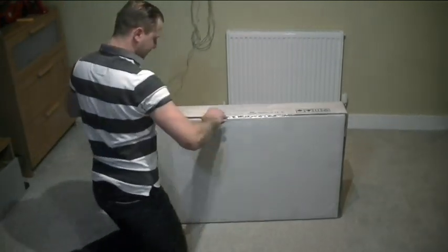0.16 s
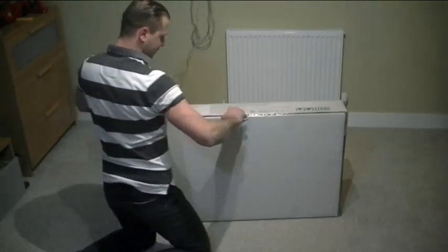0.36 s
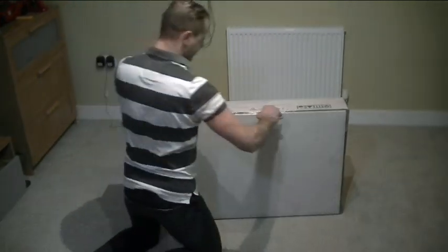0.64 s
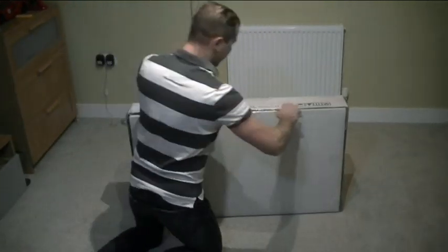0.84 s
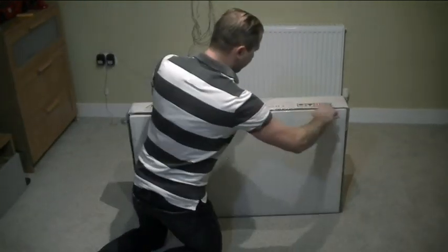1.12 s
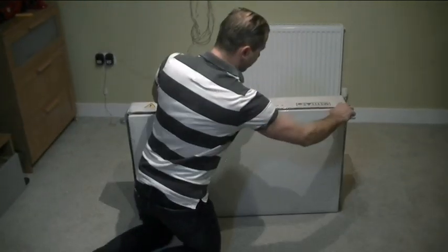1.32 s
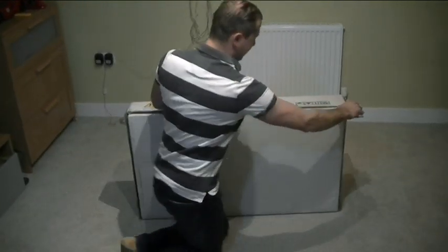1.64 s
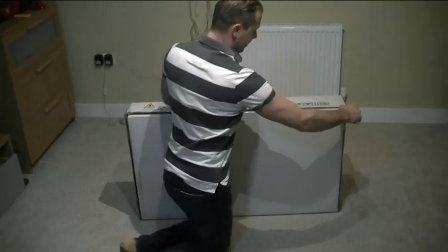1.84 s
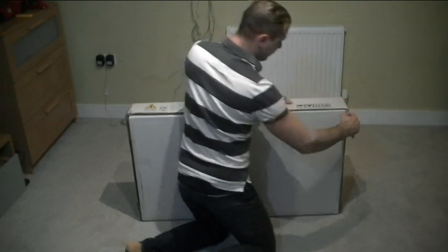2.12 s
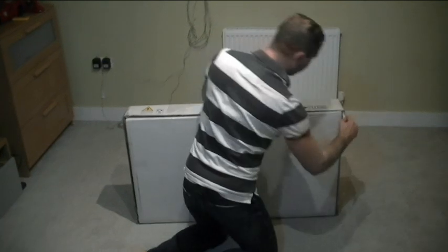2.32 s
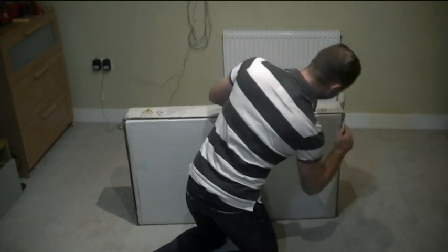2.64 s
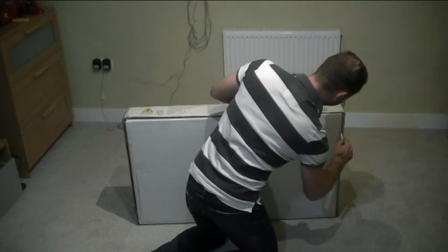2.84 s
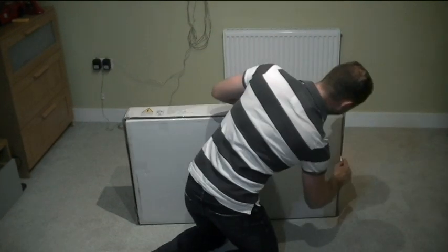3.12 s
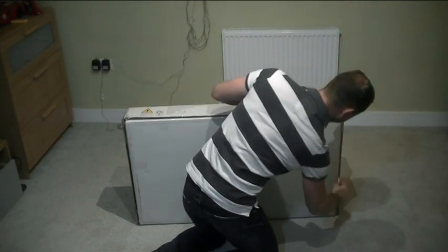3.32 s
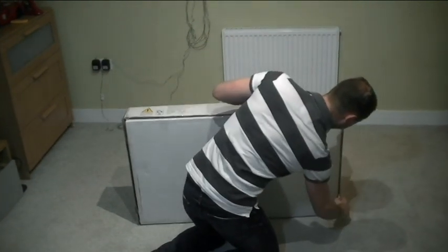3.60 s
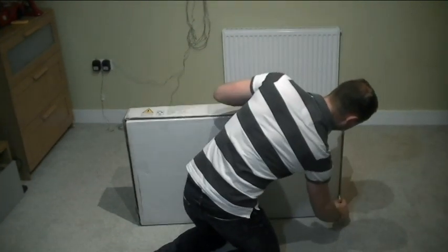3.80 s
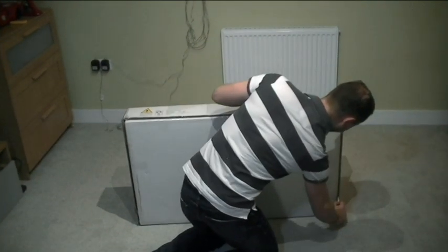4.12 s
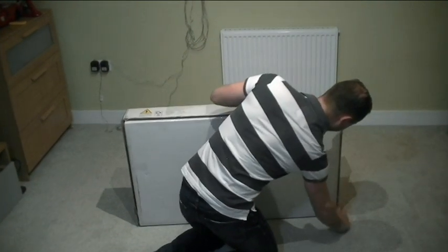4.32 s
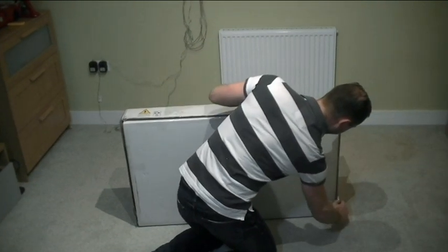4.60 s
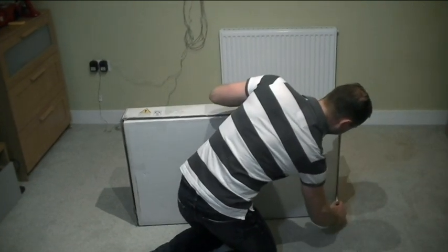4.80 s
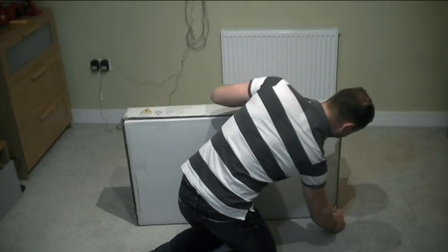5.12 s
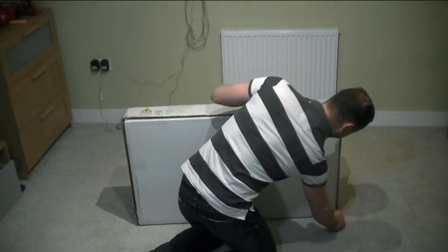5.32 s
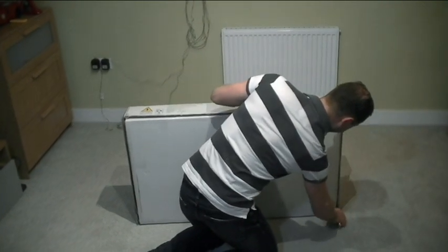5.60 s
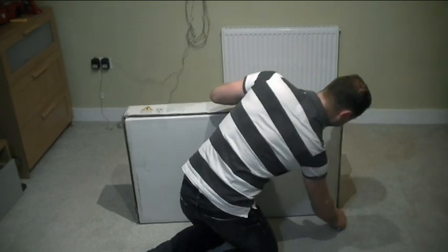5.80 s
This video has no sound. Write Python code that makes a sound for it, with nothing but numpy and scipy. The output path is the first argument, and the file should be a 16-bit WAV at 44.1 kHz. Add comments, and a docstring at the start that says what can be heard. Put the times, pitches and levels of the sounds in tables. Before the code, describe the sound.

Packing tape is cut from a big hollow box, heard from a few metres with a stereo pair. First comes a continuous gritty hiss with dry ticks and soft low bumps, thinning out; next come brief separate strokes with pauses, loud tape snaps and ripping bursts that make the cardboard knock and flutter. The carpeted room adds a short, close reverberation over faint steady noise.

```python
"""Knife through box tape

A few metres from the microphone pair, in a carpeted room, a knife slits the tape along a large cardboard box.
The sliding blade makes a stream of tiny fractures that drive tape, card and hollow box together.
The tape ticks and rips in short bursts; where a seam gives way, fractures make the box thump
and its wall and flap ring with a fluttering pitch. Echoes and a faint steady room noise surround it all."""
import sys
import numpy as np
from scipy import signal
from scipy.fft import rfft, irfft, next_fast_len
from scipy.io import wavfile
from scipy.ndimage import uniform_filter1d, map_coordinates

SR = 44100
rng = np.random.default_rng(int(sys.argv[2]) if len(sys.argv) > 2 else 0)


def generate_wav(signal):
    """Clip the signal to [-1, 1] and save it as 16-bit WAV at the path in sys.argv[1]."""
    frames = np.transpose(np.atleast_2d(signal))
    scaled = np.clip(frames, -1, 1) * 32767
    pcm = np.round(scaled).astype(np.int16)
    wavfile.write(sys.argv[1], SR, pcm)


N = 262395

# Two long cuts along the top of the box, as points on a curve.
# Each row: time in seconds, level in dB, bite into the cardboard in dB.
LONG_CUTS = [(0.0, -43.5, -4), (0.23, -46, -4), (0.33, -38, -4.5), (0.55, -42, -2), (0.72, -43, -6.5),
             (0.87, -37.5, -10), (1.0, -45.5, 0), (1.15, -41, -8.5), (1.27, -46, -6), (1.41, -43.5, -2),
             (1.55, -52, 4.5), (1.72, -59.5, 2.5), (1.78, -48.5, -2), (2.0, -47, -5), (2.16, -46, -5.5),
             (2.32, -54, -2), (2.39, -51.5, 1.5), (2.5, -65, -7)]
# Short pushes of the blade down the end of the box.
# Each row: start in seconds, length in seconds, level in dB, bite in dB.
PUSHES = [(2.543, 0.11, -57, -6.5), (2.651, .04, -51, 0.5), (2.7, 0.13, -39.5, -5.5),
          (2.896, .06, -49.5, 1.5), (2.955, 0.065, -41, -0.5), (3.131, 0.059, -38.5, -4.5),
          (3.227, 0.099, -47, -3), (3.344, 0.12, -49.5, -1), (3.495, 0.052, -45.5, -2),
          (3.658, 0.022, -41, -14), (3.906, 0.053, -54.5, -1.5), (4.023, 0.11, -57.5, 2.5),
          (4.2, 0.19, -44.5, -4), (4.738, 0.044, -60, 8), (4.868, 0.095, -45.5, -0.5),
          (5.006, 0.068, -63, 1.5), (5.101, 0.06, -50, 1.5), (5.24, 0.056, -48, -1.5),
          (5.3, 0.068, -41.5, -6), (5.407, 0.14, -49.5, -3.5), (5.56, 0.057, -52.5, -9),
          (5.729, 0.11, -58.5, -2), (5.802, 0.037, -53.5, -4)]
PUSH_ATTACK_S, PUSH_SAG_DB_PER_S, PUSH_RELEASE_S = 0.017, 17.5, 0.028
# The deeper the bite, the more the hollow box rumbles: rumble at a bite of 0 dB, and dB gained per dB of bite.
CUT_RUMBLE_DB, RIP_RUMBLE_DB, RUMBLE_PER_BITE = -8.5, -14.5, 0.85

# Short rips of the tape.
# Each row: start in seconds, level in dB, bite in dB, length in seconds, pitch of the tape in Hz.
RIPS = [(0.071, -38, -32, 0.023, 7350), (0.471, -38.5, -5.5, 0.022, 8200), (0.617, -35, -5.5, 0.0089, 6000),
        (0.656, -37.5, -1, 0.011, 5500), (0.73, -32.5, 3, 0.011, 3020), (0.799, -34.5, -4, 0.015, 8050),
        (0.92, -34.5, -6, 0.032, 6300), (1.007, -35, -18, 0.011, 5560), (1.504, -37, -10, 0.014, 6400),
        (1.745, -52.5, 1.5, 0.028, 3000), (1.864, -42.5, -9, 0.016, 6900),
        (2.131, -42.5, -0.5, 0.009, 5500), (2.688, -22.5, -8, 0.011, 11600),
        (2.733, -31.5, -6.5, 0.019, 11000), (2.776, -32.5, -3, .029, 7300), (2.952, -43, -6, 0.012, 10000),
        (2.992, -42, -5, 0.013, 8500), (3.054, -35, -4, 0.054, 11200), (3.257, -44.5, 0, 0.013, 3500),
        (3.636, -47.5, -1.5, 0.008, 9000), (3.669, -43.5, -7.5, 0.024, 4970), (3.988, -35, 0, 0.0086, 4380),
        (4.33, -28, -1, .039, 3120), (4.433, -40, -7, 0.0069, 3950), (4.64, -58, 1, 0.017, 2460),
        (4.766, -50.5, -12, 0.016, 3520), (4.883, -38.5, -8.5, .011, 4430),
        (5.155, -27.5, -3.5, 0.029, 4800), (5.302, -38, -17, 0.0044, 8600), (5.518, -44, -6, .008, 7700),
        (5.565, -42, -4.5, 0.015, 4500), (5.803, -42.5, 4, 0.0061, 2690)]
# Sharp ticks of the tape.
# Each row: time in seconds, relative level in dB, pitch of the snapping strip in Hz.
TICKS = [(0.2004, -45, 7200), (0.626, -39, 6040), (0.7396, -34, 6560), (0.8708, -37, 10000),
         (1.39, -41.5, 6600), (1.7254, -47.5, 8200), (2.272, -37.5, 5800), (2.3265, -43.5, 6360),
         (2.4771, -45.5, 8850), (2.771, -25, 5300), (3.137, -33, 10000), (3.258, -39.5, 8250),
         (3.4976, -42.5, 8500), (3.6315, -45.5, 10100), (3.874, -50.5, 6900), (3.911, -50.5, 9500),
         (4.0845, -46, 6900), (4.1721, -51.5, 6000), (4.207, -45, 6900), (4.238, -40.5, 7600),
         (4.6666, -52, 9600), (4.8771, -36.5, 7850), (5.124, -47, 9100), (5.3124, -32, 9250),
         (5.4218, -44, 7440), (5.5183, -43.5, 7700)]
# Thumps of the flexing box; wall and flap ring at pitches set by how much tape still holds them.
# Each row: start in seconds, boom in dB, clap relative to boom in dB, length in seconds,
# wall pitch in Hz, wall level in dB, flap pitch in Hz, flap level in dB.
THUMPS = [(0.733, -29, -3, 0.0067, 391, -22, 1560, -20), (1.187, -48, -18, 0.034, 224, -46, 1520, -64),
          (2.775, -58, 2, 0.0079, 191, -36, 2027, -30), (4.34, -38, 1, 0.015, 344, -26, 896, -21.5),
          (4.742, -63, -3, 0.019, 249.6, -44, 846, -45), (5.159, -34.5, -1, 0.031, 349, -19.5, 1980, -22.5),
          (5.81, -44, -10, 0.0077, 294, -37, 1620, -38)]
# The box wall gives softly under the hand. Each row: start in seconds, level in dB.
BUMPS = [(0.0, -44.5), (0.29, -50.5), (0.488, -50), (0.806, -43), (0.885, -47), (0.97, -47), (1.755, -46),
         (2.698, -39.5), (3.185, -57), (3.262, -47.5), (3.546, -51.5), (4.09, -55), (4.425, -62),
         (4.889, -68), (5.51, -51), (5.566, -45.5)]
BUMP_S = 0.018

# Ringing of the hollow box, then of its panels. Each row: pitch in Hz, width in Hz, relative level in dB.
BOX_MODES = [(163, 25, -26.5), (223.1, 8, 2.5), (286, 19, 9), (350, 120, 17), (440, 55, 11),
             (437, 8.6, -20)]
PANEL_MODES = [(970, 68, 11), (1050, 130, 18.5), (1555, 150, 17.5), (1670, 320, 12), (1940, 220, -33.5)]

# Spectra of the sliding tape, the snapping tape, the rasping card, the box cavity,
# a thump of the hollow box and the room noise. Each row: frequency in Hz, relative density in dB per Hz.
HISS_SPECTRUM = [(1200, -31.5), (2300, -7), (3200, -1), (5000, 0.5), (7000, 2), (8500, 3.5), (10000, -1),
                 (12000, -10), (14000, -17.5), (16000, -32)]
TICK_SPECTRUM = [(1200, -18), (2500, 4), (4500, 3), (8500, 5), (11000, 1), (14000, -13), (16000, -36)]
RASP_SPECTRUM = [(250, -33.5), (550, -3), (900, 3.5), (1300, 1.5), (1900, 5.5), (2600, 0), (4000, -15),
                 (8000, -63.5)]
HOLLOW_SPECTRUM = [(25, -55), (55, -28), (84, -7), (105, -22), (135, -18.5), (165, 1), (350, -7.5),
                   (550, -6.5), (1000, -17), (3000, -89)]
THUD_SPECTRUM = [(30, -51), (85, -19), (135, -27), (200, -15), (240, 4), (430, 1.5), (560, -7), (1000, -14),
                 (3000, -44)]
AIR_SPECTRUM = [(18, -24), (30, -35.5), (355, -7.5), (760, -14), (822, -4.5), (913, -8.5), (1100, -3),
                (1350, -11.5), (2410, -13.5), (4190, -15.5), (8080, -20.5), (14000, -25), (16000, -66)]
AIR_DB = -61.5

# Decay of the carpeted room. Each row: frequency in Hz, time to fall 60 dB in seconds.
ROOM_DECAY = [(100, 0.32), (300, 0.18), (1000, 0.25), (3000, 0.24), (8000, 0.22), (15000, 0.21)]
# Likeness of the two microphones. Each row: frequency in Hz, left-right correlation from -1 to 1.
MIC_LIKENESS = [(30, .4), (70, .7), (130, .94), (300, .94), (600, .76), (1800, .74), (3500, .67),
                (6500, .82), (8300, .35), (10000, -.2), (13000, -.1)]
# Mismatch of the two microphones.
# Each row: frequency in Hz, left minus right in dB, left phase lead in radians.
MIC_MISMATCH = [(100, -1.2, 0), (400, -1.2, .03), (1000, -1.1, .15), (3500, -.6, .1), (6000, .1, 0),
                (8000, 1.3, -.2), (8900, 2, -.8), (10300, -1.8, -1.1), (15000, -1, -.7)]
LOW_CUT_HZ = 47  # the box radiates little below this
BAND_LIMIT_HZ = 15850


def amp(db):
    """Decibels to gain."""
    return 10 ** (np.asarray(db) / 20)


def unit(x):
    """Scales to energy 1."""
    return x / np.sqrt(np.sum(x ** 2) + 1e-20)


def read(points, hz):
    """Reads a table on a log-frequency axis."""
    f, value = np.transpose(points)
    return np.interp(np.log(hz + 1), np.log(f + 1), value)


def add(mix, s, sound):
    """Adds a sound to the mix at a time in seconds."""
    part = mix[..., max(round(s * SR), 0):][..., :sound.shape[-1]]
    part += sound[..., :part.shape[-1]]


def through(x, response):
    """Plays a signal through a response."""
    return signal.oaconvolve(x, response)[:N]


def colour(points, size=4096):
    """The causal, minimum-phase click that has this spectrum, at energy 1."""
    gains = amp(read(points, np.fft.rfftfreq(size, 1 / SR)))
    cepstrum = irfft(np.log(gains))
    # folding the cepstrum forward in time makes the click causal
    cepstrum[1:size // 2] *= 2
    cepstrum[size // 2 + 1:] = 0
    return unit(irfft(np.exp(rfft(cepstrum))))


def taut(points, hz, lift_db, octaves):
    """The click of a stretched strip of tape, with one broad resonance."""
    grid = np.geomspace(800, 18000, num=60)
    resonance = np.exp(-(np.log2(grid / hz) / octaves) ** 2)
    return colour(np.c_[grid, read(points, grid) + lift_db * resonance])


def ring(modes, size=4096):
    """Damped modes after one push; a wider mode dies sooner."""
    t = np.arange(size) / SR
    out = np.zeros(size)
    for k, (hz, width, db) in enumerate(modes):
        mode = unit(np.exp(-np.pi * width * t) * np.sin(2 * np.pi * hz * t))
        out += (-1) ** k * amp(db) * mode  # neighbours swing in opposite directions
    return unit(out)


def fractures(count, per_s, spread_db):
    """Tiny breaks at random moments, a few much larger than the rest; rms 1."""
    chance, size, sign = rng.random((3, count))
    sizes = amp(spread_db * np.minimum(-np.log(1 - size), 4)) * np.sign(sign - .5)
    return unit(sizes * (chance < per_s / SR)) * np.sqrt(count)


def burst(length, response, per_s, spread_db, onset, size=8192):
    """Fractures that swell quickly and die, through a response; rms near 1 over the length in seconds."""
    length = max(length, .002)
    u = np.arange(size) / SR / length
    envelope = (1 - np.exp(-u / onset)) * np.exp(-u ** 2)
    run = fractures(size, per_s, spread_db) * envelope
    return unit(signal.fftconvolve(run, response)) * np.sqrt(length * SR)


def strokes():
    """Gains of the blade's hiss, rasp and rumble: long cuts, then pushes that rise, sag and release."""
    t = np.arange(N) / SR
    s, level, bite = np.transpose(LONG_CUTS)
    release = np.exp(-np.maximum(t - s[-1], 0) / PUSH_RELEASE_S)
    moves = [(amp(np.interp(t, s, level)) * release, np.interp(t, s, bite))]
    for start, length, db, bite in PUSHES:
        age = np.clip(t - start, 0, 1)
        rise = np.minimum(age / PUSH_ATTACK_S, 1)
        release = np.exp(-np.maximum(age - length, 0) / PUSH_RELEASE_S)
        moves.append((amp(db - PUSH_SAG_DB_PER_S * age) * rise * release, bite))
    # share: how strongly the bite raises tape hiss, card rasp and box rumble
    return [np.sqrt(sum((gain * amp(share * bite)) ** 2 for gain, bite in moves))
            for share in (0, 1, RUMBLE_PER_BITE)]


def blade(gains, hiss, rasp, hollow, hiss_db=-2, rasp_db=-2, judder_db=-1.0, per_s=5000, spread_db=3.0):
    """The sliding edge catches unevenly; the same fractures drive tape, card and box."""
    tape, card, box = gains
    catch = uniform_filter1d(uniform_filter1d(rng.standard_normal(N), 400), 150)
    catch = unit(catch) * np.sqrt(N)
    drive = fractures(N, per_s, spread_db) * amp(judder_db * catch)
    tape_hiss = through(drive * tape * amp(hiss_db), hiss)
    card_rasp = through(drive * card * amp(rasp_db), rasp)
    box_rumble = through(drive * box * amp(CUT_RUMBLE_DB), hollow)
    return tape_hiss + card_rasp + box_rumble


def crackle(gain, level_db=-8, per_s=180, spread_db=5.0):
    """Single fibres and crumbs of glue pop under the moving blade."""
    return through(fractures(N, per_s, spread_db) * amp(level_db) * gain, colour(TICK_SPECTRUM))


def wander(x, depth_db, size=512):
    """Tape and fibres vary along the cut, so the colour of the scrape keeps shifting."""
    hz, at, z = signal.stft(x, SR, nperseg=size)
    # a random field in dB, interpolated over warped frequency and over blocks of 7 frames
    field = rng.standard_normal((40, len(at) // 7 + 2))
    where = np.meshgrid(6 * np.log(1 + hz / 500), np.arange(len(at)) / 7, indexing="ij")
    shift_db = depth_db * map_coordinates(field, where, order=1)
    return signal.istft(z * amp(shift_db), SR, nperseg=size)[1][:N]


def rips(rasp, hollow, level_db=0):
    """A stretch of tape parts all at once, as a burst of fractures through tape, card and box."""
    out = np.zeros(N)
    for s, db, bite, length, hz in RIPS:
        tape = taut(HISS_SPECTRUM, hz, lift_db=5, octaves=0.33)
        rumble_db = RIP_RUMBLE_DB + RUMBLE_PER_BITE * bite
        response = tape + amp(bite) * rasp + amp(rumble_db) * hollow
        gain = amp(db + level_db) * np.linalg.norm(response)
        add(out, s, gain * burst(length, response, per_s=4000, spread_db=2.5, onset=0.21))
    return out


def ticks(rasp, level_db=19, card_db=-15, crumble_db=-22):
    """One brittle snap of the tape, with a few milliseconds of crumbling."""
    out = np.zeros(N)
    for s, db, hz in TICKS:
        response = taut(TICK_SPECTRUM, hz, lift_db=6.5, octaves=0.42) + amp(card_db) * rasp
        crumble = burst(0.0068, response, per_s=5500, spread_db=1.0, onset=1.0)
        add(out, s, amp(db + level_db) * response)
        add(out, s, amp(db + level_db + crumble_db) * crumble)
    return out


def thumps(hollow, clap):
    """A seam lets go: fractures make the panels clap and the box boom."""
    out = np.zeros(N)
    for s, db, clap_db, length, *_ in THUMPS:
        add(out, s, amp(db) * burst(length, hollow, per_s=1400, spread_db=8.5, onset=0.051))
        add(out, s, amp(db + clap_db) * burst(length, clap, per_s=950, spread_db=2.0, onset=0.028))
    return out


def panels(wall_s=0.015, flap_s=0.015, swell=0.29, wall_flutter=0.069, flap_flutter=0.047,
           overtone=1.28, overtone_db=-8, size=8192):
    """Wall and flap swing up while the seam tears, then die away with a fluttering pitch."""
    out, t = np.zeros(N), np.arange(size) / SR
    for s, _, _, length, wall_hz, wall_db, flap_hz, flap_db in THUMPS:
        partials = [(wall_hz, wall_db, wall_s, wall_flutter),
                    (wall_hz * overtone, wall_db + overtone_db, wall_s, wall_flutter),
                    (flap_hz, flap_db, flap_s, flap_flutter)]
        for hz, db, decay, flutter in partials:
            bend = unit(uniform_filter1d(rng.standard_normal(size), 120)) * np.sqrt(size)
            phase = 2 * np.pi * np.cumsum(hz * (1 + flutter * bend)) / SR
            swing = (1 - np.exp(-t / (swell * length))) ** 2 * np.exp(-t / decay)
            add(out, s, amp(db) * swing / swing.max() * np.sin(phase))
    return out


def bumps(hollow):
    """The wall flexes and the hollow box answers with a soft, low knock."""
    out = np.zeros(N)
    for s, db in BUMPS:
        add(out, s, amp(db) * burst(BUMP_S, hollow, per_s=3000, spread_db=3.0, onset=0.2))
    return out


def pair(a, b):
    """Two close microphones: a shared and an opposed signal, weighted to the likeness at each frequency."""
    alike = np.clip(read(MIC_LIKENESS, np.fft.rfftfreq(len(a), 1 / SR)), -1, 1)
    mid = rfft(a) * np.sqrt((1 + alike) / 2)
    side = rfft(b) * np.sqrt((1 - alike) / 2)
    return irfft([mid + side, mid - side], len(a))


def place(x, wet_db, early_db, early_s, size=20480):
    """From one spot: direct sound, a cluster of echoes from box, wall and floor, and a short tail."""
    t = np.arange(size) / SR
    noise = rng.standard_normal((2, size)) * np.clip(t / 0.0093 - .4, 0, 1)  # the tail fades in late
    hz, at, z = signal.stft(noise, SR, nperseg=256)
    decay_db = -60 * at / read(ROOM_DECAY, hz)[:, None]
    tails = signal.istft(z * amp(decay_db), SR, nperseg=256)[1][:, :size]
    signs = np.sign(rng.standard_normal((2, size)))
    arrivals = rng.random((2, size)) < 3000 / SR  # about 3000 echoes per second
    echoes = signs * arrivals * np.exp(-t / early_s) * (t > .0005)
    response = pair(*(amp(wet_db) * unit(tail) + amp(early_db) * unit(echo)
                      for tail, echo in zip(tails, echoes)))
    response[:, 0] += amp(-7.5)  # direct sound
    return np.array([through(x, r[:size // 4 * 3]) for r in response])


def room(x, wet_db=-5.0, early_db=-4.5, early_s=0.0079, count=6):
    """As hand and body move along the box, the sound crossfades round a cycle of echo patterns."""
    spot = np.arange(N) / SR / .035  # a new pattern every 35 ms
    out = np.zeros((2, N))
    for k in range(count):
        away = abs((spot - k + count / 2) % count - count / 2)
        fade = np.cos(np.pi / 2 * np.minimum(away, 1))
        out += place(x * fade, wet_db, early_db, early_s)
    return out


def air():
    """The faint steady noise of the room: coloured noise at the microphone pair."""
    tone = colour(AIR_SPECTRUM)
    return amp(AIR_DB) * pair(*(through(rng.standard_normal(N), tone) for _ in range(2)))


def scene(snap_db=-5):
    """All the cutting sounds through the box, in the room."""
    hiss, card, cavity = colour(HISS_SPECTRUM), colour(RASP_SPECTRUM), colour(HOLLOW_SPECTRUM)
    box_ring = through(ring(BOX_MODES), cavity)[:len(cavity)]
    hollow = unit(cavity + 0.96 * unit(box_ring))
    rasp = unit(card + 0.15 * ring(PANEL_MODES))
    gains = strokes()
    scrape = blade(gains, hiss, rasp, hollow) + crackle(gains[0])
    cutting = wander(scrape, depth_db=1.5)
    snaps = ticks(rasp)
    dry = cutting + rips(rasp, hollow) + snaps + bumps(hollow) + thumps(colour(THUD_SPECTRUM), rasp)
    radiated = signal.lfilter(*signal.butter(2, LOW_CUT_HZ, "highpass", fs=SR), dry)
    # the broad panels and the snapping tape face the microphones, so they sound drier than the blade
    facing = place(panels(), wet_db=-12, early_db=-13.0, early_s=0.0091) + amp(snap_db) * snaps
    return room(radiated) + facing + air()


def record(dry):
    """The microphone pair's slight mismatch in level and phase, then the band limit."""
    size = next_fast_len(N + 4096)
    hz, mismatch = np.fft.rfftfreq(size, 1 / SR), np.array(MIC_MISMATCH)
    balance_db = read(mismatch[:, :2], hz)
    lead = read(mismatch[:, ::2], hz)
    left = amp(balance_db / 2) * np.exp(.5j * lead)  # half to each side
    heard = irfft(rfft(dry, size) * np.array([left, 1 / left]), size)[:, :N]
    band_limit = signal.firwin(511, BAND_LIMIT_HZ, window=("kaiser", 9), fs=SR)
    return signal.oaconvolve(heard, band_limit[None], "same")


dry = scene()
out = record(dry)
generate_wav(out)
```